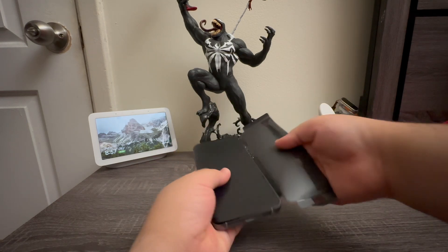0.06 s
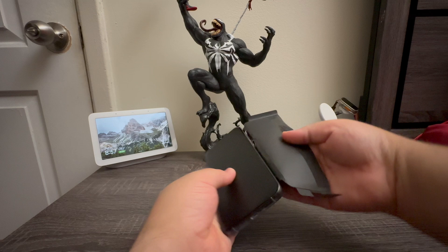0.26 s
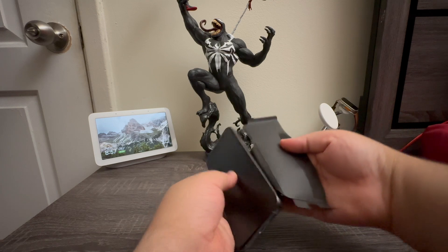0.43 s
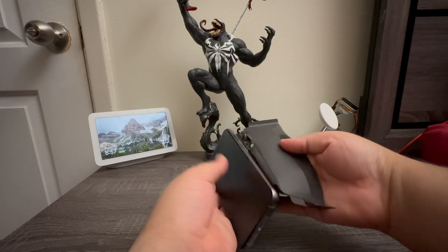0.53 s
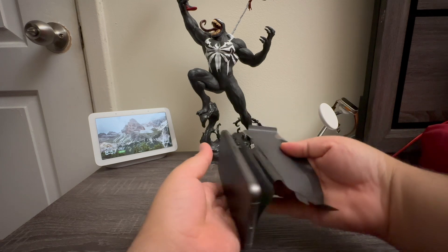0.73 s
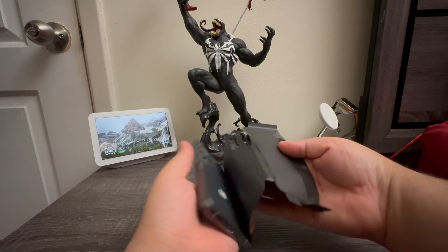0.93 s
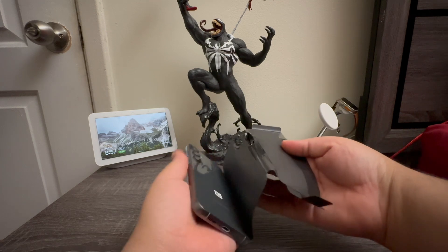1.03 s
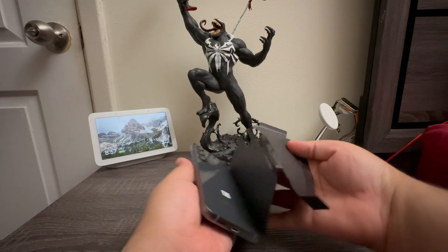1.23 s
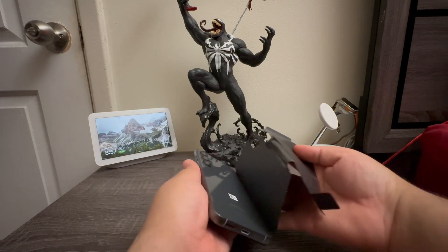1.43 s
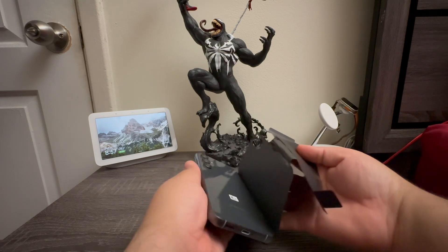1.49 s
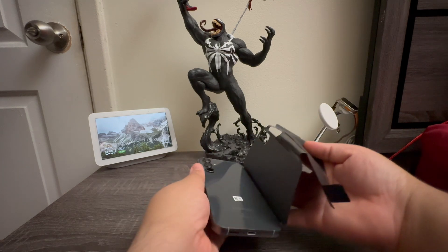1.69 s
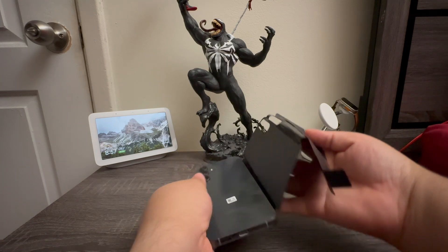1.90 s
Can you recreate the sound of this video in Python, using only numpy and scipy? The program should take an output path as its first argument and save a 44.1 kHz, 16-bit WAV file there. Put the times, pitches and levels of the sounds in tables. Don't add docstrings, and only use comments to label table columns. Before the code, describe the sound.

Stiff protective film peels from a glass-faced device in jerks: quick crackles first, then two loud bright snaps, then smaller ticks and a faint late crackle, close to a phone microphone in a small quiet room.

```python
import sys
import numpy as np
from scipy import signal
from scipy.fft import rfft, irfft
from scipy.io import wavfile
from scipy.ndimage import uniform_filter1d

SR = 44100
rng = np.random.default_rng(int(sys.argv[2]) if len(sys.argv) > 2 else 0)


def nominal_scale(level):
    x = np.asarray(level, float) / 20
    return 10 ** x


def master_out(mix):
    frames = np.transpose(np.atleast_2d(mix))
    ceiling = np.clip(frames, -1, 1)
    pcm = np.round(ceiling * 32767).astype(np.int16)
    wavfile.write(sys.argv[1], SR, pcm)


N = 85995
BLOCK = 4096

# columns f/Hz, width/Hz, level/dB
THUMP_MODES = [(312, 87, 2.5), (417, 170, -2.5)]
THUD_MODES = [(802, 200, -4.5), (983, 150, 2.5), (1258, 260, -3), (1643, 200, 0.5)]
# columns multiple of the ring pitch, width/Hz, level/dB
RING_MODES = [(0.771, 260, -12), (1.0, 520, 8.5), (1.171, 420, -3)]
# columns f/Hz, width/Hz, level/dB
CRISP_MODES = [(3365, 600, 3.5), (4920, 970, 1), (6080, 500, 0), (7604, 1460, -6), (9750, 970, -4)]
AIR_MODES = [(12300, 1500, -16), (14500, 900, 0)]
# columns f/Hz, side minus mid level/dB
SNAP_SIDE = [(200, -13), (500, -9), (1000, -13), (2200, -10), (4500, -3.5), (9000, -5), (13000, -3)]
# columns f/Hz, left minus right level/dB
HAND_SHADOW = [(300, 4.5), (1000, 1), (2100, -4), (3500, 5), (5000, 0), (9500, -3), (14000, 6)]


def snap(peak_db, thud_db, crisp_db, air_db, length, pan_db, ring_hz, bright_hz, thump_db,
         bright_db, bright_width_hz, thump_lag_s):
    t, hz = np.arange(BLOCK) / SR - .003, np.fft.rfftfreq(BLOCK, 1 / SR)
    rise_s = 0.00054
    envelope = np.where(t < 0, np.exp(t / rise_s), np.exp(-t / max(length, 1e-4)))
    small_slips = rng.standard_normal((2, BLOCK)) * envelope
    first_slip = 7.65 * (abs(t - np.array([[0], [.0002]])) < .5 / SR)
    mid, side = flattened(small_slips + first_slip)

    def late(seconds):
        return np.exp(-2j * np.pi * hz * seconds)

    ring = [(ring_hz * multiple, width, db) for multiple, width, db in RING_MODES]
    crisp = list(CRISP_MODES)
    nearest = np.argmin([abs(row[0] - bright_hz) for row in crisp])
    crisp[nearest] = (bright_hz, max(bright_width_hz, 50), bright_db)
    low_lag = late(0.00032)
    groups = [([(156, 28, 0)], -50, late(0.0054)),
              (THUMP_MODES, thump_db, late(thump_lag_s)),
              (THUD_MODES, thud_db, low_lag),
              (ring, -14, low_lag),
              (crisp, crisp_db, -1),
              (AIR_MODES, air_db, 1)]
    colour = 0
    for table, db, phase in groups:
        group = modes(table, hz)
        colour = colour + nominal_scale(db) * phase * group / np.linalg.norm(group)

    side = side * nominal_scale(read(SNAP_SIDE, hz))
    lean = nominal_scale(read(HAND_SHADOW, hz) / 2)
    ports = irfft(np.array([(mid + side) * lean, (mid - side) / lean]) * colour)
    ports = ports * np.exp(np.minimum(t + 2 * rise_s, 0) / rise_s)
    return evened(ports) * nominal_scale(peak_db - 20.5 + np.array([[pan_db], [-pan_db]]) / 2)


def modes(table, hz):
    detune = 1 + 0.017 * rng.standard_normal(8)
    response = 0
    for k, ((f, width, db), shift) in enumerate(zip(table, detune)):
        mode = 1j * hz * width / ((f * shift) ** 2 - hz ** 2 + 1j * hz * width)
        response = response + (-1) ** k * nominal_scale(db) * mode
    low = .5 * min(row[0] for row in table)
    return response * (1j * hz / (low + 1j * hz)) ** 3


def flattened(x):
    z = rfft(x)
    power = uniform_filter1d(abs(z) ** 2, size=max(x.shape[-1] // 160, 1), axis=-1)
    return z / np.sqrt(power + 1e-9)


# columns t/s, peak level/dB, thud level/dB, crisp level/dB, air level/dB
SNAPS = [(0.075, -48.5, -4.5, 4.5, -72), (0.119, -34, -24, -18, -24.5), (0.232, -16.5, -16.5, -11, -43),
         (0.353, -22, -9, -5, -13), (0.429, -18, -29.5, -6.5, -11.5), (0.649, -5.5, -28, -15.5, -36),
         (0.736, -11, -26, -1, -8), (0.947, -25, -23.5, -15, -13.5), (1.116, -45, -29, -13.5, -22),
         (1.146, -32.5, -12.5, -1, -1.5), (1.188, -33.5, -33, -7, -4), (1.257, -20.5, -32, -16.5, -31),
         (1.275, -20, -22.5, -7, -27), (1.368, -50, -25, -34, -41), (1.478, -21, -39.5, -18.5, -49),
         (1.693, -56, -20, -14, -2), (1.925, -30, -14, -1, -14), (0.236, -25.5, -10, -7, -50),
         (1.283, -25, -33, -9.5, -25), (1.103, -54, -33, -13, -28), (1.385, -52.5, -28, -25, -40),
         (1.204, -42, -31, -12, -15)]
# columns length t/s, left minus right level/dB, ring f/Hz, brightest mode f/Hz,
# thump level/dB
SLIPS = [(0.009, 13, 3030, 5900, -50), (0.0021, 2, 2140, 6100, -34), (0.002, -1, 2200, 3000, -15.5),
         (0.0011, -1, 1900, 5400, -18.5), (0.0026, -0.5, 2100, 7900, -65.5),
         (0.0006, -0.5, 2166, 10000, -53), (0.0025, -3, 2580, 3220, -41), (0.0038, 2, 2140, 3030, -37.5),
         (0.0012, 10, 2280, 4600, -47.5), (0.0032, 1.5, 1800, 15000, -24), (0.0075, -2, 2400, 5000, -33),
         (0.001, -2, 2690, 9600, -57), (0.0032, -1.5, 2210, 5140, -43), (0.00088, 4, 2270, 3500, -43),
         (0.001, -1, 2696, 5030, -73), (0.0021, 7.5, 2110, 4200, -23.5), (0.0045, 1.5, 2160, 9200, -24.5),
         (.0008, 4, 2300, 4600, -3), (0.0031, -3, 1680, 5040, -45), (0.00091, 3, 2440, 4500, -50),
         (.001, 0, 2350, 3500, -40), (.002, 2, 2170, 4800, -40)]
# columns bright mode level/dB, its width/Hz, thump lag t/s,
# level sent past the hands into the room/dB, lift of the bright mode in the room/dB
VOICES = [(4.5, 370, .0003, 5, 5), (2, 360, 0.00051, -3.5, 9), (3, 690, 0.0033, -3, 8),
          (0, 600, 0.0023, -3, -0.5), (5, 500, .0003, -3.5, -1), (4, 700, .004, 1, -3.5),
          (4.5, 710, .0003, -2, 3.5), (7.5, 530, 0.00035, 1.5, -1), (2, 400, 0.00033, 5.5, 1),
          (4, 500, .0003, 3.5, 5), (4.5, 560, 0.00034, -3, 0), (3, 310, .0003, -3.5, -2),
          (9, 290, .0003, -0.5, -5.5), (4.5, 400, .0003, 9, 5), (7.5, 430, .0003, -5, 1),
          (3, 400, .0003, -9, -2), (5.5, 530, 0.00029, -1, -2), (4, 400, .0003, -4, 0),
          (14, 260, .0003, -1, -1), (4, 400, .0003, 3, 0), (-1, 400, .0003, 4, 0), (3, 400, .0003, 2, 0)]
LEADS_US = [63, 58, 54, 55, 63, 58, 162, 147, 60, 80, 80, 127, -53, 61, 126, 58.5, 60, 56, -57.5, 58.5,
            60.5, 59]


def snaps():
    direct, sent = np.zeros((2, N + BLOCK)), np.zeros((3, N + BLOCK))
    hz = np.fft.rfftfreq(BLOCK, 1 / SR)
    for k, ((s, *levels), slip, voice_row, lead_us) in enumerate(zip(SNAPS, SLIPS, VOICES, LEADS_US)):
        *voice, send_db, lift_db = voice_row
        at = round((s - .002) * SR)
        z = rfft(snap(*levels, *slip, *voice))
        lead = np.exp(1j * np.pi * hz * lead_us / 10 ** 6 * np.array([[1], [-1]]))
        direct[:, at:at + BLOCK] += irfft(z * lead)
        near_bright = 1 / (1 + ((hz - slip[3]) / max(voice[1], 50)) ** 2)
        sent[k % 3, at:at + BLOCK] += irfft(z.mean(0) * nominal_scale(send_db + lift_db * near_bright))
    return direct[:, :N], sent[:, :N]


# columns t/s, left level/dB, right level/dB
ECHOES = [
    (.0032, -9.5, -6),
    (.0072, -26, -21),
    (0.0116, -10.5, -11),
    (0.016, -11.5, -26.5),
    (.018, -20, -29),
    (.023, -24, -21.5),
    (.028, -20.5, -29),
    (0.03, -19, -18.5),
]
# columns f/Hz, level/dB
ECHO_COLOUR = [(200, 4.5), (1400, -1), (2100, -2), (3300, -3), (5500, -3), (9500, -2.5), (12000, -13.5),
               (15000, -12.5)]
# columns f/Hz, t/s
ROOM_T60 = [(250, 0.13), (700, 0.24), (2000, 0.17), (5000, 0.23), (10000, 0.16), (16000, 0.18)]


def room(x):
    length = SR // 2
    taps, early = np.zeros((2, length)), np.zeros((2, length))
    at = np.arange(250, length - 20, 20) + rng.integers(0, 20, (2, (length - 251) // 20))
    np.put_along_axis(taps, at, rng.choice([-1., 1.], at.shape), 1)
    hz, t, z = signal.stft(taps, SR, nperseg=128)
    decay = nominal_scale(-60 * t / read(ROOM_T60, hz)[:, None])
    build_up = np.minimum(t / 0.0085, 1)
    tail = signal.istft(z * decay * build_up, SR, nperseg=128)[1][:, :length]

    smear = np.exp(-np.arange(128) / SR / 0.0006)
    for s, left_db, right_db in ECHOES:
        scatter = rng.standard_normal((2, 128)) * smear
        scatter /= np.linalg.norm(scatter, axis=1, keepdims=True)
        start = round(s * SR)
        early[:, start:start + 128] += nominal_scale([[left_db], [right_db]]) * scatter

    both = early + nominal_scale(-5) * tail / np.linalg.norm(tail[0])
    both = irfft(rfft(both) * nominal_scale(read(ECHO_COLOUR, np.fft.rfftfreq(length, 1 / SR))))
    return signal.fftconvolve(x[None], both, axes=1)[:, :N]


# columns t/s, level/dB
PULL = [(0, -68.5), (.21, -66), (.25, -54.5), (.41, -63), (.47, -65), (.62, -77.5), (.67, -52.5),
        (.85, -65.5), (.93, -62), (.98, -68), (1.1, -71.5), (1.155, -60), (1.25, -59.5), (1.33, -73.5),
        (1.6, -68), (1.755, -74.5), (1.79, -92), (1.95, -85)]
# columns f/Hz, level/dB
HISS = [(650, -25.5), (1150, -4), (2200, -3), (3000, -8), (4500, -6), (9800, -4), (11700, -6),
        (14800, -6.5)]
# columns f/Hz, left-right likeness
HISS_SAME = [(500, 0.17), (3000, 1), (9000, .2), (13000, 0.31)]


def glue():
    def field(hz, t):
        pull_db = np.interp(t, *np.transpose(PULL))
        grain = rng.standard_normal((t.size, hz.size)).T
        patches = evened(uniform_filter1d(uniform_filter1d(grain, 5, 0), 20, 1))
        flicker = evened(uniform_filter1d(rng.standard_normal(t.shape), 4, 1))
        top_db = (hz > 11500) * 0.61 * (pull_db + 65)
        return read(HISS, hz) + pull_db + top_db + 1.6 * patches + 1.5 * flicker + 31
    return nominal_scale(-36) * noise(size=256, field_db=field, same=HISS_SAME)


# columns t/s, length t/s, from f/Hz, to f/Hz, level/dB
SQUEAKS = [
    (1.0, 0.062, 8600, 8800, -86),
    (1.622, .065, 8800, 8200, -65),
]


def squeaks():
    t, out = np.arange(N) / SR, np.zeros(N)
    for s, length, from_hz, to_hz, db in SQUEAKS:
        u = np.clip((t - s) / length, 0, 1)
        phase = 2 * np.pi * np.cumsum(from_hz + (to_hz - from_hz) * u) / SR
        out += nominal_scale(db) * np.sin(np.pi * u) * np.sin(phase)
    return out


# columns f/Hz, level/dB
RUMBLE = [(25, -31), (46, -2), (62, -1.5), (110, -9.5), (200, -16), (550, -27.5), (1300, -26),
          (9000, -44.5)]
# columns f/Hz, left-right likeness
RUMBLE_SAME = [(40, .93), (125, 0.83), (300, 0.31), (2000, .3)]
# columns t/s, level/dB
TRAFFIC = [
    (0.0, -72),
    (0.358, -69.5),
    (1.004, -73.5),
    (1.444, -66.5),
    (1.644, -65),
    (1.878, -73),
    (1.95, -66.5),
]


def air():
    def field(hz, t):
        low_cut_db = 110 * np.log10(np.clip(hz / 46, .01, 1))
        swell_db = np.interp(t, *np.transpose(TRAFFIC)) + 72
        return read(RUMBLE, hz) + low_cut_db + (hz > 90) * (hz < 400) * swell_db
    t = np.arange(N) / SR
    waver = 1 + 0.54 * np.cos(2 * np.pi * .5 * t)
    hum = np.sin(2 * np.pi * 59.3 * t) * waver
    rumble = evened(noise(size=2048, field_db=field, same=RUMBLE_SAME))
    return nominal_scale(-63) * rumble + nominal_scale(-63) * hum


def noise(size, field_db, same):
    frames, hz = 4 * N // size + 5, np.fft.rfftfreq(size, 1 / SR)
    a, b, c, d = rng.standard_normal((frames, len(hz), 4)).T
    like = np.clip(read(same, hz), -1, 1)[:, None]
    left = a + 1j * b
    right = like * left + np.sqrt(1 - like ** 2) * (c + 1j * d)
    t = np.arange(frames)[None] * size / 4 / SR
    z = np.array([left, right]) * nominal_scale(field_db(hz[:, None], t))
    return signal.istft(z, nperseg=size, noverlap=size - size // 4)[1][:, :N]


def evened(x):
    return x / np.sqrt(np.mean(abs(x) ** 2) + 1e-20)


def read(points, hz):
    f, value = np.transpose(points)
    return np.interp(np.log(hz + 1), np.log(f + 1), value)


def scene():
    film, sent = snaps()
    echoes = sum(room(spot) for spot in sent)
    return film + echoes + glue() + squeaks() + air() * nominal_scale([[1.2], [-1.2]])


def roll_off(x):
    return signal.sosfilt(signal.butter(12, 16970, fs=SR, output="sos"), x)


# columns from f/Hz, to f/Hz, level over the surroundings/dB
GAPS = [(10466, 12900, 4.5), (15850, 20000, 10.5)]


def record(dry):
    edge = signal.firwin(255, 16500, window=("kaiser", 9), fs=SR)
    x = signal.oaconvolve(dry, edge[None], "same")
    hz, t, z = signal.stft(x, SR, nperseg=512, noverlap=384)
    keep = np.ones(z.shape[1:])
    for from_hz, to_hz, over_db in GAPS:
        band = (hz > from_hz) & (hz < to_hz)
        level_db = 10 * np.log10((abs(z[:, band]) ** 2).mean((0, 1)) + 1e-20)
        around_db = signal.medfilt(level_db, kernel_size=21)
        keep[band] = np.clip((level_db - around_db - over_db) / 4, 0, 1)
    mid = (z[0] + z[1]) / 2
    side = (z[0] - z[1]) / 2 * np.where(hz > 12700, nominal_scale(-10), 1)[:, None]
    z = np.array([mid + side, mid - side]) * keep
    mix = signal.istft(z, SR, nperseg=512, noverlap=384)[1][:, :N]
    return roll_off(mix)


dry = scene()
out = record(dry)
master_out(out)
```